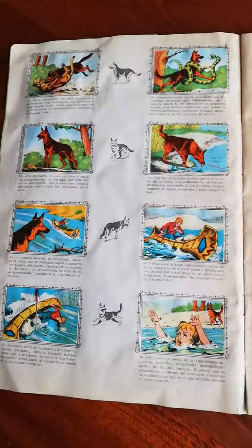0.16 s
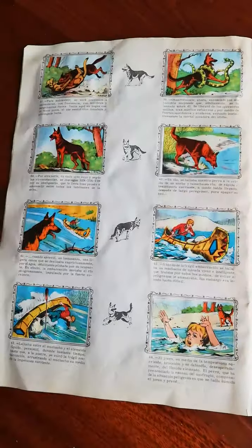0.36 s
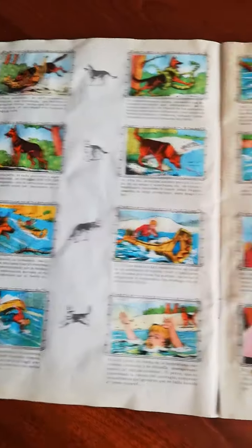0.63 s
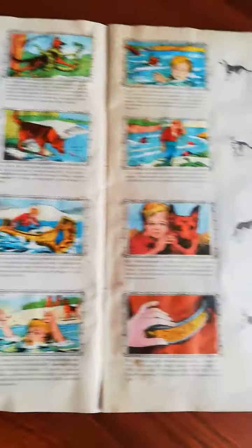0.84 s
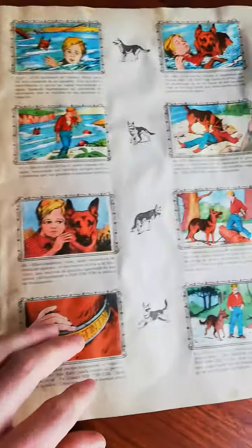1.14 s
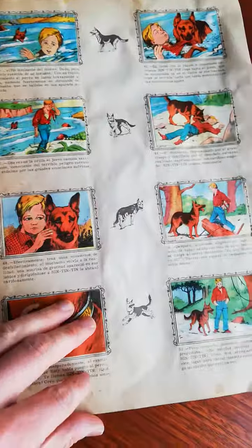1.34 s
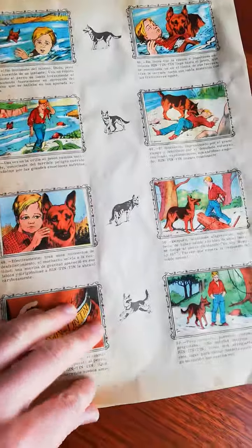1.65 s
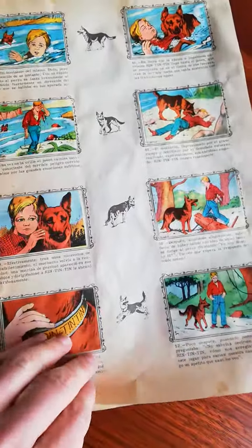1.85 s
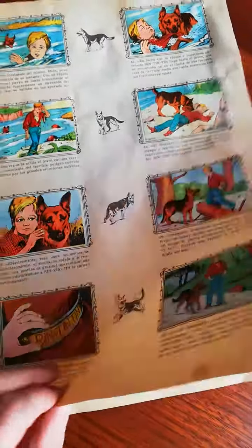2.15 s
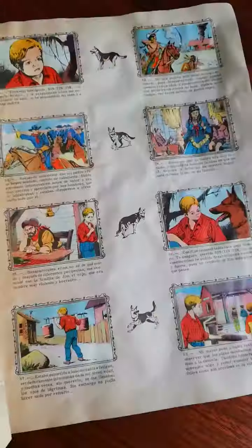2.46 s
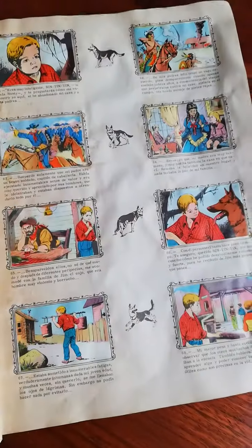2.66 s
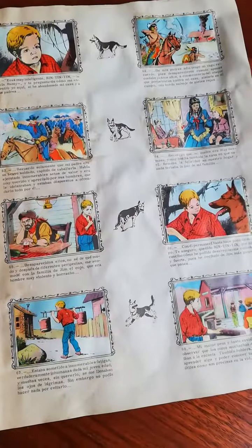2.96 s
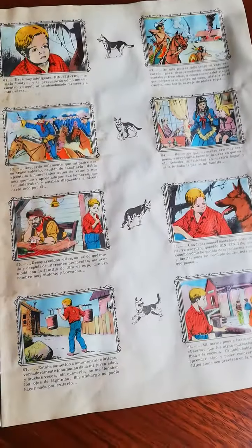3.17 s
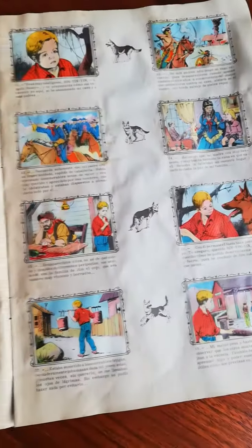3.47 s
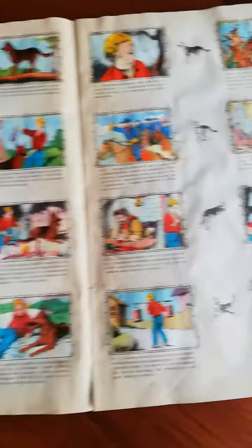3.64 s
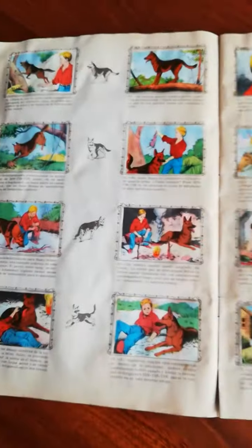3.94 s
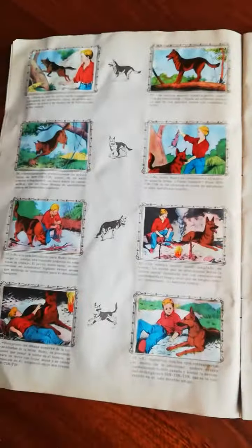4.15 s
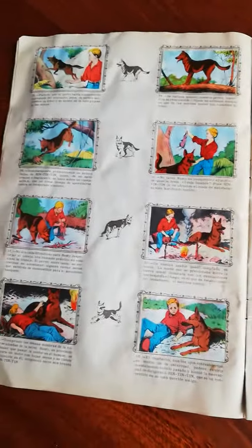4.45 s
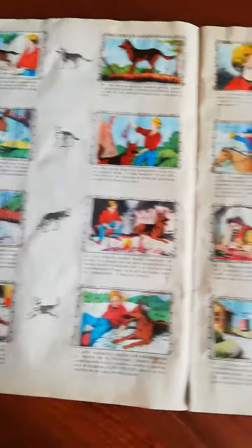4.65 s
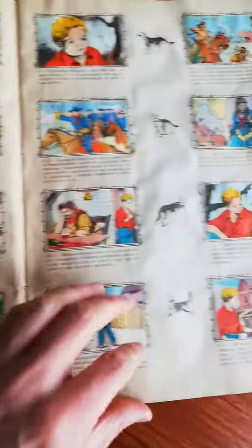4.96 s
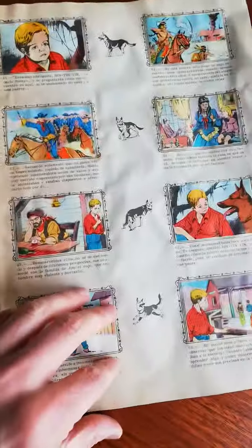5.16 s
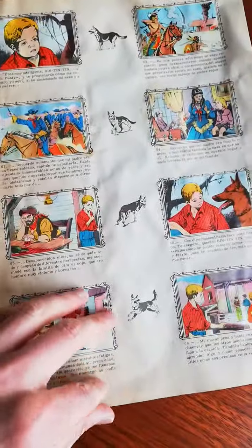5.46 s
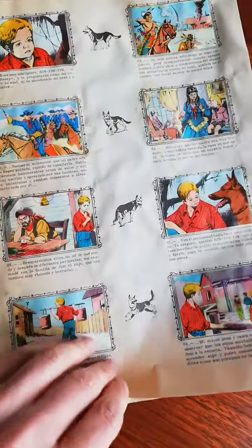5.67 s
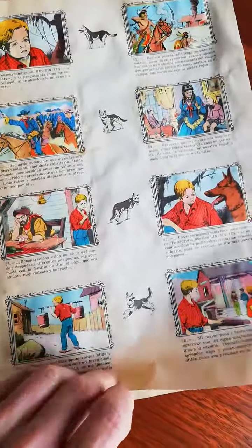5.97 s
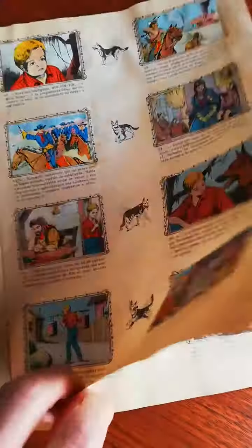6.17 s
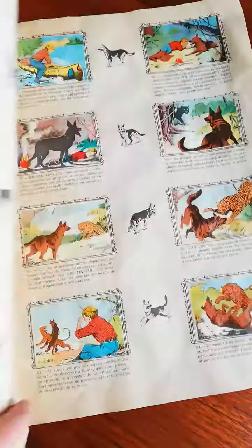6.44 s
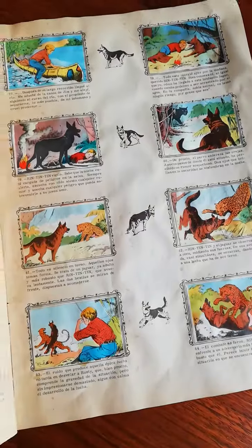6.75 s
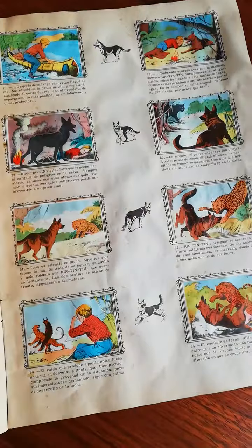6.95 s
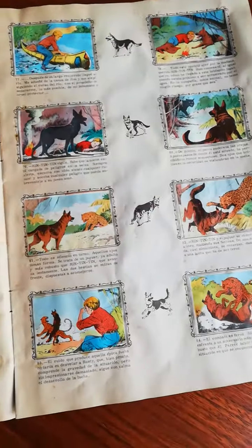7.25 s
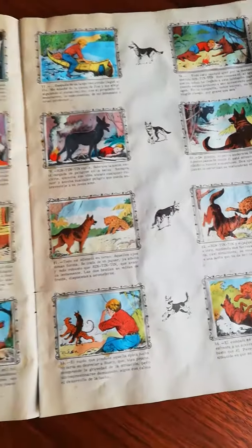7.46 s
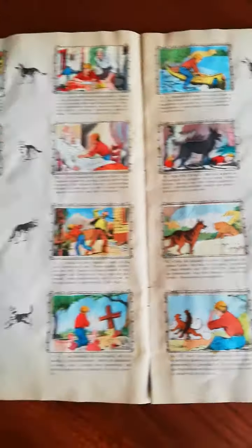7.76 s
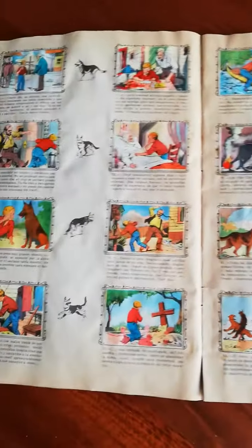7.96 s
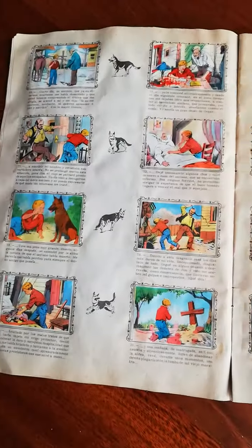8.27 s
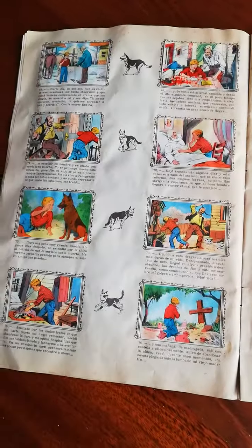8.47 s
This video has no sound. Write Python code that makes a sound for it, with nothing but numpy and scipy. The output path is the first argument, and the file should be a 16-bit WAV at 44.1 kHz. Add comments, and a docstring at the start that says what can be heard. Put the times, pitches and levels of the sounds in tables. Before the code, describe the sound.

A quiet indoor room, with low building wash, slight hiss and a deep hum that swells and fades throughout. Near 0.8 s a faint paper tick and a light brush, then tiny ticks and soft sliding until 1.9 s. From 2.0 to 2.35 s a large dry sheet turns with crisp pops, rustling and bright friction; soft low flaps of air follow around 2.5-2.8 s. Another cluster of duller crackles runs from 2.95 to 3.5 s. Then mostly hum, with slight touches near 4.7 and 5.1 s. A sharp tick at 5.5 s and hissing finger rubs to 5.9 s lead into the second turn: dense, bright snaps at 6.0-6.25 s, loudest near 6.2, with rustle and flap trailing to 6.6 s. Small ticks follow, then separate firm pops at 7.2-7.6 s. The hum peaks just after 8 s; little else remains until 8.6 s. Close stereo, with short sparse echoes.

```python
"""Pages of an old paper album are lifted and turned by hand on a table in a quiet room.
From the start a low hum swells and fades over a steady wash; the first faint brushes and ticks come near 0.8 s.
From 2 to 3.5 s the sheet buckles in noise bursts through three bands, rustles, and flaps as low-passed air noise.
After a lull, dry friction (bright and dull grainy noise) leads to the loudest snaps near 6.2 s and more until 7.6 s.
Sparse decaying echoes follow the paper; the hum is strongest just after 8 s. Two microphones a hand apart listen."""
import sys
import numpy as np
from scipy import signal
from scipy.fft import rfft, irfft, next_fast_len
from scipy.io import wavfile
from scipy.ndimage import uniform_filter1d

SR = 44100
rng = np.random.default_rng(int(sys.argv[2]) if len(sys.argv) > 2 else 0)


def wrap_up_sound(samples):
    """Save the sound to the file named by the first command line argument, as 16-bit audio."""
    columns = np.atleast_2d(samples).T
    # keep every value between -1 and 1, then stretch to whole-number steps
    tamed = np.clip(columns, -1, 1)
    steps = np.round(tamed * 32767).astype(np.int16)
    wavfile.write(sys.argv[1], SR, steps)


N = 379701


def snap(peak_db, sheet_hz, middle_db, treble_db, pan_db, fall_ms):
    """Snap-through buckling: a jolt and a noise burst excite three bands, the low one ringing longest."""
    size, rise_ms, middle_hz = 2048, 0.8, 2924
    t = np.arange(size) / SR
    shared, own = rng.standard_normal(size), rng.standard_normal((2, size))
    shifted = np.roll(shared, rng.integers(-9, 10))  # a small time difference between the sides
    burst = np.array([shifted, shared]) + 0.75 * own
    # the brighter the snap, the higher its crack sits
    crack_hz = np.clip(8840 + 179 * treble_db, 5000, 10000)
    # (centre [Hz], level [dB], stretch of the fall, band edges as a ratio to the centre)
    bands = [(sheet_hz, 0, 1.2, 1.4), (middle_hz, middle_db, 1.05, 1.6), (crack_hz, treble_db, 0.75, 1.35)]
    out = np.zeros((2, size))
    for hz, db, linger, spread in bands:
        fall = np.exp(-1000 * t / (fall_ms * linger))
        drive = burst * fall * np.tanh(1000 * t / rise_ms)
        drive[:, round(rise_ms * SR / 1000)] += 2.08 * np.sqrt(middle_hz / hz)  # the jolt
        band = signal.butter(2, [hz / spread, hz * spread], "band", fs=SR, output="sos")
        out += gain_of(db) * evened(signal.sosfilt(band, drive))
    # the whole page jerks and pushes air
    push = signal.butter(2, [300, 950], "band", fs=SR, output="sos")
    out += gain_of(-20.0) * evened(signal.sosfilt(push, burst * np.exp(-t / 0.0048)))
    peak = abs(out.mean(0)).max()
    return out / peak * gain_of(peak_db + sides(pan_db))


# The sheet's buckles, levels before the filters that follow: (start [s], peak level [dB], pitch of the sheet [Hz],
# middle against low [dB], treble against low [dB], left against right [dB], fall before the band's stretch [ms])
BUCKLES = [(0.812, -37.5, 1500, -9, 0.5, -13, 3.3), (1.075, -50.5, 530, 1.5, -10, -5, 2.6),
           (1.252, -50, 567, 2, -1, -6, 2.7), (1.39, -46, 1500, -3, 6, -3, 2.2),
           (1.432, -44, 1320, 2, 18, 4, 4.1), (2.01, -31.5, 1480, -4.5, -11.5, 0, 3.9),
           (2.071, -28, 1500, 2, 3, -1, 2.0), (2.113, -14, 1580, 13, 8, -4, 2.9),
           (2.165, -19.5, 1180, 3, -10.5, 0.5, 2.4), (2.228, -13, 2070, -5.5, -8.5, -1, 4.2),
           (2.235, -18, 980, -2.5, -21.5, 8, 3.2), (2.345, -23.5, 1240, 0, -20, -4, 2.8),
           (2.454, -40, 1620, -8, -18, -9, 3.0), (2.477, -30, 1450, -6.5, -17, -2, 3.1),
           (2.532, -38, 1340, -10, -9, -2, 3.3), (2.58, -37, 1070, -8, -3, -1, 3.0),
           (2.647, -34.5, 704, -14, -15, 5, 4.2), (2.698, -37, 920, -23, -22, -2, 3.7),
           (2.82, -40, 1120, -15, -20.5, 0, 3.9), (2.858, -42, 895, -4.5, 0, -1, 2.7),
           (2.882, -34.5, 750, -13, -7.5, 1.5, 5.3), (2.94, -33, 550, -15, -25.5, 0.5, 5.1),
           (2.982, -20.5, 1060, -7, -18, 5.5, 5.8), (2.987, -19.5, 1200, -8.5, -15, -9.5, 2.6),
           (3.017, -14, 1195, -12, -11.5, -4.5, 3.8), (3.031, -25, 1360, -8.5, -20, -3, 2.2),
           (3.095, -29.5, 1380, -2, -6, 5, 4.3), (3.103, -23, 1450, -6.5, -6.5, 0, 3.0),
           (3.143, -30, 1270, -13.5, -14, -3, 3.4), (3.181, -34.5, 1460, -11, -9, -1, 3.3),
           (3.203, -29, 1180, -13, -27, -5, 4.1), (3.262, -21.5, 1380, -3, -15.5, -1, 4.2),
           (3.272, -27.5, 1140, -2.5, -26, 0, 3.0), (3.297, -34, 1170, 0, -4, -3, 2.3),
           (3.461, -44, 1370, -15, -18, -4, 3.3), (3.499, -31.5, 1560, -12.5, -14.5, -6, 3.4),
           (4.656, -44, 1910, -3, 15, -5, 3.5), (5.06, -46, 1030, -4, 1, -4, 5),
           (5.471, -42.5, 1490, 3, 13, 1, 2.2), (5.493, -22.5, 2080, 14.5, 34.5, -1, 2.6),
           (5.772, -36, 2010, -3, 14, -1, 3.9), (5.974, -26, 1430, -7.5, -15, 2.5, 2),
           (6.022, -25, 1330, -1.5, -8, 3, 3.2), (6.051, -35.5, 850, -10, -12, 3, 3.3),
           (6.084, -13, 1630, 10, 15.5, 3, 2.6), (6.11, -26, 1530, 3.5, -10, 2, 3.0),
           (6.123, -26, 1500, 2, 1, 0, 1.8), (6.167, -18.5, 1240, 2.5, -2, 4, 4.5),
           (6.172, -11.5, 1910, 6, 7, 4, 3.0), (6.185, -14.5, 1910, 4, -1, 0.5, 5.5),
           (6.22, -7, 2140, 9, 11.5, 0.5, 3.5), (6.446, -23, 1150, -9, -17, 6, 1.8),
           (6.53, -25, 1190, -7.5, -12, -4, 2.8), (6.65, -45, 1500, -2, 6, 0, 2.0),
           (6.68, -42, 1500, 0, 8, 0, 2.0), (6.796, -30.5, 1280, -17, -39, -2.5, 4.8),
           (6.898, -43, 1450, -16, -20, -3, 3.6), (7.054, -54, 1500, 1, 6, 2, 1.9),
           (7.206, -44, 1500, 0, 7.5, 0, 2.3), (7.229, -16.5, 1090, 0.5, -0.5, 1, 3.7),
           (7.237, -14.5, 1020, 1, 3, 5, 5.1), (7.28, -15, 1820, -9.5, -20.5, -5.5, 3.0),
           (7.312, -16.5, 1050, -3, -0.5, 2, 3.5), (7.323, -29.5, 990, -14, -22, -3.5, 3.4),
           (7.362, -24, 1490, -4, -17, -6.5, 3.2), (7.529, -10.5, 1430, 13.5, 8.5, -4, 3.5),
           (7.533, -22, 1490, -11, -4, -13.5, 4.6), (7.58, -21, 1200, 0, -11, -4, 2.7),
           (8.297, -50, 1440, -16, -20, -5, 2.7)]


def buckling():
    """Impulsive radiation: each buckle sounds alone, its highest treble limited by the crease's slow flip."""
    snaps = np.zeros((2, N))
    for start, *row in BUCKLES:
        add(snaps, start, snap(*row))
    return colour(snaps, [(9500, 0), (12500, -13), (16000, -18.5)])  # (frequency [Hz], level [dB])


# Spectrum of the rustling sheet: (frequency [Hz], relative level [dB])
RUSTLE_SPECTRUM = [(250, -39), (600, -12.5), (1100, 0.5), (1600, -1.5), (2500, -4), (4000, -17.5),
                   (7000, -17), (12000, -36.5)]
# The sheet moves and rustles: (loudest [s], rise [s], fall [s], level [dB], left against right [dB])
RUSTLE_GESTURES = [(.81, 0.013, .15, -68, -15), (1.274, 0.13, 0.17, -73, -16),
                   (2.0, 0.17, 0.13, -58.5, 4.5), (2.18, 0.21, 0.085, -43.5, -2),
                   (2.236, 0.03, 0.043, -27.5, -1.5), (2.33, 0.11, .12, -51.5, -3),
                   (2.53, 0.17, 0.24, -47, -1.5), (2.66, 0.045, 0.043, -57, -4),
                   (2.95, 0.13, 0.051, -52, -7), (3.04, .02, 0.088, -41, -6), (3.114, 0.089, .15, -46, -10),
                   (3.22, .1, 0.038, -44.5, -1), (3.284, 0.036, 0.081, -44, -10.5),
                   (3.5, 0.028, 0.081, -65, -5), (5.65, 0.049, 0.24, -62, 0), (5.81, 0.098, .3, -59, 5),
                   (6.03, 0.086, 0.12, -46, -4), (6.14, 0.081, 0.032, -44, -1),
                   (6.23, 0.14, 0.051, -33, 6.5), (6.28, 0.034, 0.27, -41.5, -6.5),
                   (6.46, .03, 0.035, -45, -10), (6.545, 0.079, .12, -42.5, -4.5),
                   (6.81, .01, 0.19, -58, -7), (6.91, 0.036, 0.041, -59, -2.5),
                   (7.33, 0.14, 0.28, -55, -15), (7.53, .01, 0.084, -49, -3)]


def rustling():
    """Crackling noise: the moving sheet's flickering rustle is mixed with many tiny creases letting go."""
    rustle = noise(RUSTLE_SPECTRUM, patchy_db=4.0, flicker_db=6.0, alike=1.0, size=256)
    creases = evened(colour(crackle(per_s=220, spread_db=4.5), RUSTLE_SPECTRUM))
    return gestures(RUSTLE_GESTURES) * evened(rustle + 0.56 * creases)


# Spectrum of the pushed air: (frequency [Hz], relative level [dB])
FLAP_SPECTRUM = [(120, -35.5), (240, -8.5), (350, 4.5), (550, 0.5), (900, -2.5), (1600, -34.5)]
# The page flaps and pushes air: (loudest [s], rise [s], fall [s], level [dB], left against right [dB])
FLAP_GESTURES = [(1.274, .08, 0.06, -60, -8), (2.18, 0.092, 0.13, -58, 4), (2.36, 0.12, .09, -54, 0),
                 (2.54, 0.13, 0.23, -47.5, 1.5), (2.65, 0.0197, .05, -44, 0),
                 (2.71, 0.076, 0.077, -46, -0.5), (2.83, 0.045, 0.16, -59.5, 0),
                 (3.114, 0.09, 0.052, -53, -0.5), (3.25, 0.12, 0.084, -70, 4),
                 (6.088, 0.025, 0.12, -53, -5), (6.165, .03, 0.12, -46, 0.5), (6.3, 0.11, 0.24, -54.5, 2),
                 (6.46, 0.038, 0.044, -47.5, -1), (6.55, 0.079, 0.11, -46, -2), (6.9, .05, 0.079, -56, -1),
                 (6.98, .04, 0.064, -58, 1), (7.33, 0.089, 0.11, -57, 4.5)]


def flapping():
    """Air displacement: the broad page pushes air, heard as low, flickering noise."""
    return gestures(FLAP_GESTURES) * noise(FLAP_SPECTRUM, patchy_db=4.0, flicker_db=3.5, alike=0.87, size=256)


# Spectra of the bright hiss and of the duller scrape: (frequency [Hz], relative level [dB])
HISS_SPECTRUM = [(3000, -42), (5500, -19.5), (7000, 1.5), (9000, 7), (11000, 7), (16000, -20.5)]
SCRAPE_SPECTRUM = [(900, -30.5), (2000, -11.5), (4000, -8.5), (6000, -5), (9000, -18.5)]
# Skin or page brushes over paper: (loudest [s], rise [s], fall [s], hiss level [dB],
# left against right [dB], scrape against hiss [dB])
BRUSH_GESTURES = [(0.854, 0.074, 0.15, -48.5, -6, -4), (1.265, 0.064, 0.081, -57, 2, -8),
                  (1.31, 0.05, 0.12, -56, -2, -8), (1.52, 0.032, 0.13, -56, -4.5, -5.5),
                  (1.7, 0.2, 0.38, -61, -3, -6.5), (1.87, 0.048, 0.073, -38, -1.5, -7),
                  (1.925, .02, 0.12, -53.5, -3, -5), (2.09, 0.18, 0.094, -41.5, 0.5, 0),
                  (2.185, 0.042, 0.065, -48.5, -3, -16), (2.26, .02, 0.21, -55.5, -2, 5.5),
                  (2.5, 0.11, 0.075, -54, 2, -12.5), (2.55, 0.047, 0.088, -50, 5, -1),
                  (2.646, 0.027, 0.025, -55, -5.5, -1.5), (2.89, 0.054, 0.091, -58, -5, -6.5),
                  (3.1, .08, 0.19, -51, 0, -1), (3.265, 0.033, 0.1, -57, 0, -3),
                  (3.372, .02, 0.034, -59.5, -3, 0), (4.689, .05, 0.13, -54, -7, -4.5),
                  (4.828, .05, 0.038, -64, -13, -17), (5.065, 0.0083, 0.23, -62.5, 1, -8),
                  (5.355, 0.076, 0.024, -56, -4, -8), (5.6, 0.1, 0.077, -51.5, 2, -11),
                  (5.665, 0.064, 0.15, -47, -0.5, -4.5), (5.776, 0.012, 0.025, -43.5, 1.5, -6.5),
                  (5.834, 0.047, 0.061, -36, 0, -7), (5.89, 0.055, 0.27, -47, -2.5, -4),
                  (6.12, 0.022, 0.024, -49, -9, 8.5), (6.38, 0.35, 0.17, -52.5, -3, 3),
                  (6.55, 0.18, 0.049, -51.5, 3.5, -3), (6.6, .03, 0.044, -51.5, -1, 3),
                  (6.67, .02, 0.14, -62, 1, -6), (6.92, 0.1, 0.04, -63.5, -1, -10),
                  (7.03, 0.072, 0.045, -65, -1, -6), (7.34, 0.024, 0.21, -69, -5.5, 14)]


def brushing():
    """Dry friction: sliding contact gives a bright hiss with fine crackle, and a duller patchy scrape."""
    hiss = noise(HISS_SPECTRUM, patchy_db=0.5, flicker_db=2.0, alike=0.6, size=256)
    grains = evened(colour(crackle(per_s=200, spread_db=2.0), HISS_SPECTRUM))
    hiss = evened(hiss + 0.62 * grains)
    scrape = noise(SCRAPE_SPECTRUM, patchy_db=2.0, flicker_db=1.5, alike=0.37, size=256)
    hiss_rows = [row[:5] for row in BRUSH_GESTURES]
    scrape_rows = [(top, rise, fall, db + scrape_db, pan_db)
                   for top, rise, fall, db, pan_db, scrape_db in BRUSH_GESTURES]
    return gestures(hiss_rows) * hiss + gestures(scrape_rows) * scrape


# What the walls send back: (frequency [Hz], level [dB])
WALL_SPECTRUM = [(200, 3), (1200, -1.5), (3000, -2), (6000, 1), (12000, 2)]
# Time for the echoes to fall by 60 dB: (frequency [Hz], decay time [s])
DECAY_TIMES = [(300, .35), (1000, .6), (2500, .62), (6000, .42), (12000, .25)]


def room(x):
    """Reverberation: sparse echoes of random sign, each band dying exponentially at its own speed."""
    taps = np.zeros((2, SR))
    slots = np.arange(160, SR - 20, 10)
    at = slots + rng.integers(0, 10, (2, len(slots)))
    np.put_along_axis(taps, at, rng.choice([-1., 1.], at.shape), 1)
    hz, t, z = signal.stft(taps, SR, nperseg=256)
    decay = gain_of(-60 * t / read(DECAY_TIMES, hz)[:, None])
    tail = signal.istft(z * decay, SR, nperseg=256)[1]
    return signal.fftconvolve(colour(x, WALL_SPECTRUM), tail / np.linalg.norm(tail[0]), axes=1)[:, :N]


# How the microphones hear the paper: (frequency [Hz], level [dB])
MICROPHONE_RESPONSE = [(20, 0), (10000, 0), (11500, -6.5), (13500, -3), (16000, -16)]


def microphones(paper):
    """Frequency response: the microphones weight each frequency of the paper sound."""
    return colour(paper, MICROPHONE_RESPONSE)


# The rumble swells in the room's lowest mode: (time [s], level [dB])
LOWEST_MODE = [(0.0, -83), (0.09, -66), (0.24, -73), (0.43, -52.5), (0.76, -54), (0.91, -65), (1.08, -52.5),
               (1.63, -72), (1.68, -60.5), (2.66, -69.5), (3.14, -53.5), (3.21, -62), (3.43, -51),
               (3.69, -73), (4.36, -56.5), (4.53, -67), (4.79, -55), (4.89, -60.5), (5.44, -68.5),
               (5.73, -47.5), (5.9, -67.5), (6.5, -57.5), (6.71, -63.5), (7.48, -43), (7.63, -55),
               (7.84, -51.5), (7.96, -63), (8.03, -45.5), (8.13, -39), (8.61, -45.5)]
# The room's upper modes: (frequency [Hz], width [Hz], level against each other [dB])
UPPER_RESONANCES = [(146.3, 3.2, 0.5), (213.9, 5, 2)]


def rumble():
    """Modal resonance: the lowest room mode hums almost as a tone; the upper ones waver."""
    s, low_db = np.transpose(LOWEST_MODE)
    t = np.arange(N) / SR
    # pitch wander: noise low-passed at 3 Hz
    wander = evened(signal.lfilter([1], [1, -np.exp(-2 * np.pi * 3 / SR)], rng.standard_normal(N)))
    hum_hz = 73 + 1.494 * wander
    hum = np.sqrt(2) * np.sin(2 * np.pi * np.cumsum(hum_hz) / SR)
    upper = evened(sum(gain_of(db) * ring(hz, width) for hz, width, db in UPPER_RESONANCES))
    waver = evened(uniform_filter1d(rng.standard_normal(N), size=SR // 8))
    upper_db = -63 + 3.5 * waver
    return hum * gain_of(np.interp(t, s, low_db)) + upper * gain_of(upper_db)


# Spectrum of the background: (frequency [Hz], relative level [dB])
QUIET_SPECTRUM = [(12, -54.5), (25, -27), (55, -6.5), (85, -6), (120, -10), (216, -11), (260, -24.5),
                  (400, -30), (600, -32), (1400, -29), (3000, -34), (9500, -35), (12000, -41),
                  (16000, -42.5)]


def quiet_room():
    """Stationary noise: the low wash of the building and the hiss of the microphones."""
    return gain_of(-58.5) * noise(QUIET_SPECTRUM, patchy_db=0.0, flicker_db=0.0, alike=0.94, size=2048)


def gestures(rows):
    """Amplitude envelope: gestures swell to their loudest and die away, adding in power on each side."""
    # a gesture is 22 dB softer one rise before and one fall after its top; the curve rounds the top
    swell_db, swell_curve = 22, 1.44
    t, power = np.arange(0, N + 64, 64) / SR, 0
    for top, rise, fall, db, pan_db in rows:
        away = np.where(t < top, (top - t) / rise, (t - top) / fall)
        power = power + gain_of(db - swell_db * away ** swell_curve + sides(pan_db)) ** 2
    return np.array([np.interp(np.arange(N) / SR, t, side) for side in np.sqrt(power)])


def crackle(per_s, spread_db):
    """Shot noise: tiny creases let go at random as sparse short bursts, a few of them large."""
    size = gain_of(spread_db * np.minimum(rng.exponential(1, N), 4))
    size = size * (rng.random(N) < per_s / SR)
    puff = signal.lfilter([1], [1, -np.exp(-1 / (0.0017 * SR))], size)  # each dies in about 1.7 ms
    return puff * rng.standard_normal((2, N))


# Coherence of the two microphones, scaled for each noise: (frequency [Hz], likeness from 0 to 1)
COHERENCE = [(60, 1), (200, 0.93), (600, 0.32), (2000, 0.043), (8000, 0.11)]


def noise(points, patchy_db, flicker_db, alike, size=512):
    """Spatial coherence: random short-time spectra, partly shared and reaching the left microphone later."""
    spacing = 26  # samples of travel between the microphones
    frames, hz = 4 * N // size + 5, np.fft.rfftfreq(size, 1 / SR)
    a, b, c, d, patches = rng.standard_normal((frames, len(hz), 5)).T
    patches = evened(uniform_filter1d(uniform_filter1d(patches, 8, 0), 8, 1))
    flicker = evened(uniform_filter1d(rng.standard_normal(frames), 3))
    same = (alike * read(COHERENCE, hz))[:, None]
    right, own = a + 1j * b, c + 1j * d
    delay = spacing / SR * hz / (hz + 120)  # the bass arrives from all sides
    late = np.exp(-2j * np.pi * hz * delay)[:, None]
    left = same * late * right + np.sqrt(1 - same ** 2) * own
    level_db = read(points, hz)[:, None] + patchy_db * patches + flicker_db * flicker
    z = np.array([left, right]) * gain_of(level_db)
    return evened(signal.istft(z, nperseg=size, noverlap=3 * size // 4)[1][:, :N])


def ring(hz, width):
    """Resonance: noise caught in one narrow band of the given width in Hz."""
    turn = np.exp(2j * np.pi * hz * np.arange(N) / SR)
    r = np.exp(-np.pi * width / SR)
    slow = signal.lfilter([1], [1, -r], rng.standard_normal(N) / turn)
    return evened((turn * slow).real)


def colour(x, points):
    """Linear filtering: multiplies the spectrum by a response in dB."""
    size = next_fast_len(x.shape[-1])
    gain = gain_of(read(points, np.fft.rfftfreq(size, 1 / SR)))
    return irfft(rfft(x, size) * gain, size)[..., :x.shape[-1]]


def read(points, hz):
    """Interpolation: reads a curve on a log-frequency axis."""
    f, value = np.transpose(points)
    return np.interp(np.log(hz + 1), np.log(f + 1), value)


def gain_of(db):
    """Decibel law: converts a level to an amplitude factor."""
    return 10 ** (np.asarray(db) / 20)


def sides(pan_db):
    """Level difference: splits left against right evenly, in dB for each side."""
    return pan_db * np.array([[0.5], [-0.5]])


def evened(x):
    """Normalization: scales to unit rms."""
    return x / np.sqrt(np.mean(x ** 2) + 1e-20)


def add(mix, s, sound):
    """Superposition: mixes a sound in at a time in seconds."""
    part = mix[:, round(s * SR):][:, :sound.shape[1]]
    part += sound[:, :part.shape[1]]


def scene():
    """Superposition: paper close by, its echo in the room, and the background."""
    snaps = buckling()
    hand = rustling() + flapping() + brushing()
    echo = room(gain_of(-10.0) * snaps + gain_of(-13.0) * hand)
    return microphones(snaps + hand + echo) + rumble() + quiet_room()


def record(dry):
    """Band limiting: the recorder passes only what lies below about 15.9 kHz."""
    lowpass = signal.firwin(511, 15900, window=("kaiser", 9), fs=SR)
    return signal.oaconvolve(dry, lowpass[None], "same", axes=1)


dry = scene()
out = record(dry)
wrap_up_sound(out)
```